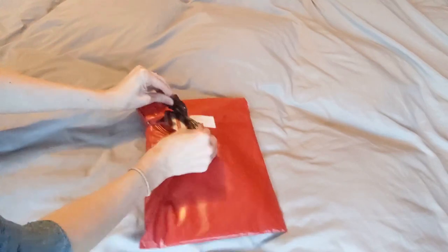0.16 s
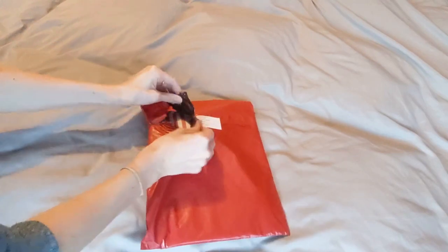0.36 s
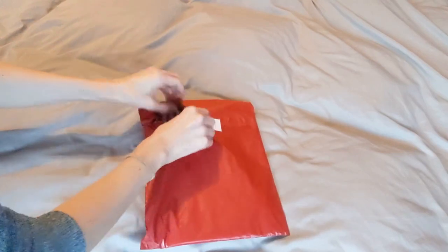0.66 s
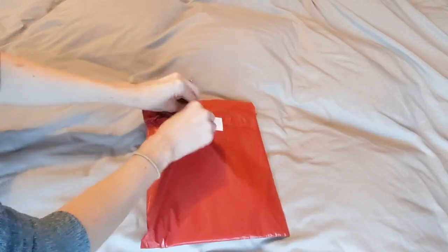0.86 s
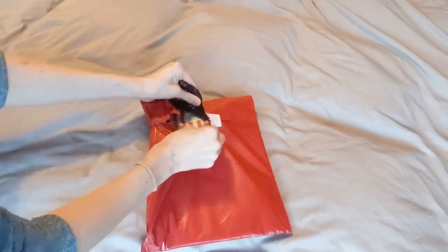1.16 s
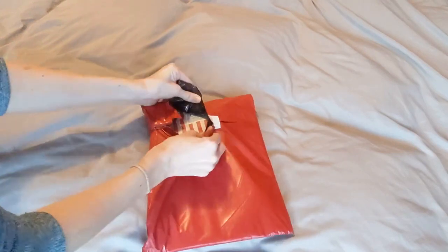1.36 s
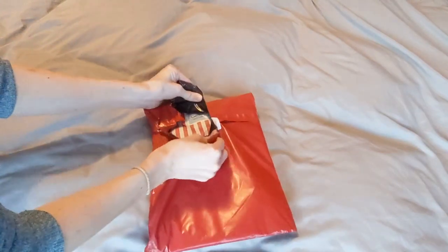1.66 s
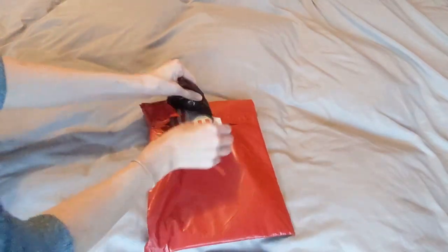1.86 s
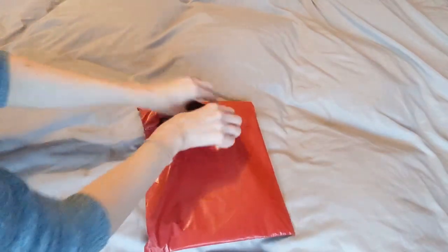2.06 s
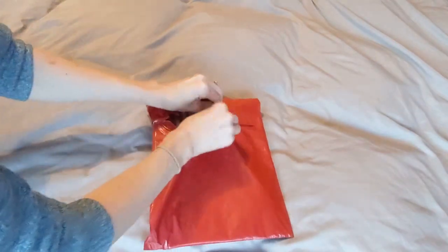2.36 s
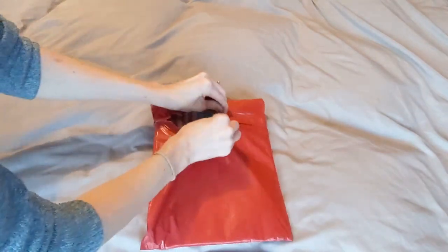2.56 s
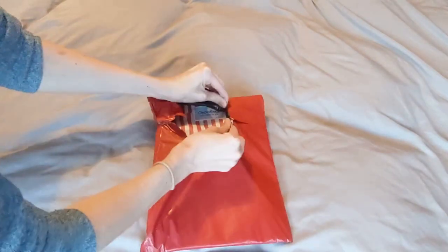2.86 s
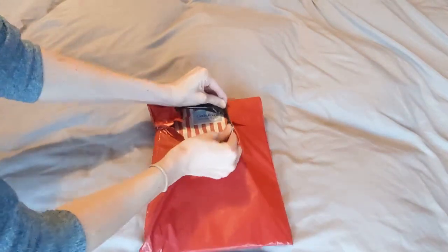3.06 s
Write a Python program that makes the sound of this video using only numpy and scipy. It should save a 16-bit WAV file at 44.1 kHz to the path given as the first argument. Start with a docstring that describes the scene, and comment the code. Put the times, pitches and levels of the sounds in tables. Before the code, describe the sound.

Close, crisp plastic crinkling in uneven bursts, with sharp snaps, over faint room hiss

```python
"""A small, soft bedroom: two hands tug and tear open a thin plastic mailer bag on a bed,
close to a stereo microphone. Each pull lets through a swarm of tiny random buckles, and single
folds snap as bursts ringing their patch of film. Sliding fingers are resonant noise with a gliding
pitch, bumps are short low tones. Changing echoes of noise answer briefly over a faint steady hiss."""
import sys
import numpy as np
from scipy import signal
from scipy.fft import rfft, irfft
from scipy.io import wavfile

SR = 44100
rng = np.random.default_rng(int(sys.argv[2]) if len(sys.argv) > 2 else 0)


def transcribe(u):
    """Save the signal u as a 16-bit wav file named by the first command-line argument.

    u: samples, shape (n,) or (channels, n), limited to [-1, 1]; the rate is SR.
    q: integer samples, one column per channel.
    """
    v = np.clip(np.atleast_2d(u).T, -1, 1)
    q = np.round(v * 32767).astype(np.int16)
    wavfile.write(sys.argv[1], SR, q)


N = 141120
TAPS = 2048  # filter length
HZ = np.fft.rfftfreq(TAPS, 1 / SR) + 1  # filter frequencies, kept above zero

# pulls on the film, levels ahead of CRINKLE_DB
# [start t/s, length t/s, start level/dB, end level/dB, body/dB, treble/dB, ring of the taut patch f/Hz]
PULLS = [(0.0, 0.066, -43, -49.5, 17.5, 2.5, 3240), (0.098, 0.077, -54, -54, 12, -3, 3950),
         (.162, 0.067, -44, -38, 1, 2, 3420), (0.225, 0.028, -27.5, -24, 5.5, 4, 3000),
         (0.261, 0.03, -24, -29.5, 1.5, 2.5, 1420), (0.296, 0.11, -36, -48.5, 0, 0, 2800),
         (0.468, 0.029, -49, -41.5, -3, -2, 3130), (.512, 0.027, -36.5, -47.5, 8.5, -1, 4430),
         (0.628, 0.032, -40.5, -50, 11.5, -1, 1950), (0.732, 0.087, -44.5, -44, 9, 4.5, 5400),
         (0.89, 0.096, -44, -61.5, 12.5, -0.5, 2020), (0.945, 0.21, -35, -40, 6, 3.5, 2740),
         (1.136, 0.061, -26, -27, 3.5, 4, 1950), (1.202, 0.1, -48, -41, 7, 6, 2900),
         (1.315, 0.053, -33, -44.5, -20, -0.5, 2850), (1.371, 0.039, -28.5, -43.5, -3, 5.5, 2640),
         (1.488, 0.17, -38.5, -35.5, 3, 7, 3180), (1.672, 0.028, -25, -40, -4.5, 0.5, 1640),
         (1.706, 0.12, -46.5, -51, 3.5, -5, 3870), (1.866, 0.093, -49, -52.5, 16.5, -11, 2550),
         (1.968, 0.044, -39, -35, 0, -3, 3100), (2.043, 0.062, -45, -48.5, 7.5, -8, 3680),
         (2.147, 0.14, -45, -50.5, 13, -8.5, 4530), (2.327, 0.14, -48.5, -38.5, 8, -6, 3880),
         (2.463, 0.049, -29, -36.5, -9.5, -1.5, 3660), (2.507, 0.067, -41, -41.5, 3.5, -10, 2670),
         (2.649, 0.064, -55.5, -43, 15, -18, 3050), (2.73, 0.028, -44.5, -40.5, -5, 8, 2380),
         (2.801, 0.026, -43.5, -35, -2, 6, 2770), (2.831, 0.086, -32.5, -35, -7.5, -5.5, 1750),
         (3.165, 0.026, -56, -38.5, -12, 4.5, 3160)]
# colour of the crinkling film [f/Hz, relative level/dB]
FILM_COLOUR = [(60, -49), (150, -31), (260, -29.5), (390, -15), (490, -18), (680, -7), (950, -8),
               (1170, -8), (1650, -3), (3300, -2), (5300, -3), (7400, -10), (10500, -5.5), (16000, -15.5)]

HISS_DB, HISS_LIKENESS = -64, 0.71  # likeness of left and right
SAME_BELOW_HZ, ROOM_SAME_BELOW_HZ = 2980, 970  # the channels grow alike below these
BOUNCE_S, BOUNCE_DB = 0.004, -1.5  # scatter off hands and bag
PATH_S = 0.06  # spacing between changes of echo path
THUMP_S = 0.002  # time to a thump's envelope peak
SLIDE_WIDTH_HZ = 370  # bandwidth of each of the two resonant poles
BODY_HZ, TREBLE_HZ, RING_OCTAVES = 1570, 6400, 0.25  # shelf corners, half-width of a ring
GENTLE_DB, DOUBLING_DB = -40, 11  # creases come twice as fast for every DOUBLING_DB of a harder pull
CREASES_PER_S, CREASE_SPREAD_DB, CREASE_S = 900, 3.5, 0.00026  # the rate in a pull of GENTLE_DB
CREASE_LOW_HZ, CREASE_HIGH_HZ, CREASE_RING_DB, CREASE_PAN_DB = 1395, 8740, 12.5, 2
PATCH_S, PATCH_DB = 0.014, 3.5  # each patch of film is busy in short spells
ATTACK_S, RELEASE_S, PULL_RING_DB = 0.001, 0.0088, 6.5  # of a pull
CRINKLE_DB, SNAP_DB = -3.5, -2  # trims of the two layers
IDLE_DB = -63  # faint ticking of the film beneath the pulls
REST_S, REST_DB = (2.99, 3.105), -15  # the hands hold almost still: the ticking drops
SNAP_S, SNAP_LEVEL_S, SNAP_RING_DB = 0.0005, 0.0011, 13.5  # a snap's level is its rms over SNAP_LEVEL_S
LEAD_S, LEAD_DB, LEAD_SPAN_S = 0.0028, -11, 0.008  # small slips crowd around the moment a fold gives
EDGE_HZ = 16100  # top of the recorder's band


def amp(db):
    """Decibels to gain."""
    return 10 ** (np.asarray(db) / 20)


def unit(x):
    """Scales to a mean energy per channel of one."""
    return x / np.sqrt(np.mean(np.sum(x ** 2, -1)) + 1e-20)


def read(points, hz):
    """Reads a table on a log-frequency axis."""
    f, value = np.transpose(points)
    return np.interp(np.log(hz + 1), np.log(f), value)


def add(mix, s, sound):
    """Mixes a sound into a stereo mix at a time in seconds."""
    part = mix[:, max(0, round(s * SR)):][:, :sound.shape[1]]
    part += sound[:, :part.shape[1]]


def colour(x, db):
    """Filters causally, at minimum phase, with the given gain at the frequencies HZ."""
    log_gain = np.log(amp(np.r_[db, db[-2:0:-1]]))
    response = np.exp(np.conj(signal.hilbert(log_gain)))
    taps = np.fft.ifft(response).real
    return signal.fftconvolve(x, taps[None], axes=1)


def blend(a, b, same):
    """Stereo pair of spectra sharing the fraction same, with the power of each side kept."""
    return np.array([a, same * a + np.sqrt(1 - same ** 2) * b])


def pair(x, corner_hz):
    """Makes two unrelated channels alike below a corner."""
    a, b = rfft(x)
    size = x.shape[1]
    same = 1 / (1 + (np.fft.rfftfreq(size, 1 / SR) / corner_hz) ** 2)
    return irfft(blend(a, b, same), size)


def pan(db):
    """Channel gains for a left-right difference."""
    return amp([[db / 2], [-db / 2]])


def film(body_db, treble_db):
    """The film's colour with shelves for its body and treble."""
    body = body_db / (1 + (HZ / BODY_HZ) ** 4)
    treble = treble_db / (1 + (TREBLE_HZ / HZ) ** 4)
    return read(FILM_COLOUR, HZ) + body + treble


def ring(hz):
    """A bump of height one around the resonance of one patch of film."""
    return 1 / (1 + (np.log2(HZ / hz) / RING_OCTAVES) ** 2)


def crack(decay_s):
    """One buckle: a noise burst that rises at once and dies within a few milliseconds."""
    u = np.arange(TAPS // 8) / SR / decay_s
    noise = pair(rng.choice([-1., 1.], (2, len(u))), SAME_BELOW_HZ)
    return noise * u * np.exp(1 - u)


def hiss():
    """Steady background of the quiet room: coloured noise, partly shared between the channels."""
    # hiss density [f/Hz, relative level/dB per Hz]
    hiss_colour = [(20, -25), (48, -7.5), (62, -23), (150, -16.5), (400, -0.5), (1100, 4.5), (1800, -5.5),
                   (4600, -12), (16000, -56)]
    gain = amp(read(hiss_colour, np.fft.rfftfreq(N, 1 / SR)))
    a, b = rfft(rng.standard_normal((2, N))) * gain
    noise = irfft(blend(a, b, HISS_LIKENESS), N)
    return amp(HISS_DB) * np.sqrt(N) * unit(noise)


def echoes():
    """Quick scatter from close by, and a short room tail dying faster in the treble."""
    # room decay [f/Hz, t60/s]
    decay_times = [(200, 0.29), (4000, 0.12), (15000, 0.02)]
    # room tail against the direct sound [f/Hz, level/dB]
    tail_levels = [(200, -6), (2500, -8.5), (8000, -4.5), (15000, 1.5)]
    t = np.arange(SR // 3) / SR
    near, far = (pair(rng.standard_normal((2, len(t))), ROOM_SAME_BELOW_HZ) for _ in range(2))
    scatter = unit(near * (t > 0.001) * np.exp(-t / BOUNCE_S))
    hz, times, z = signal.stft(far, SR, nperseg=256)
    decay = amp(-60 * times / read(decay_times, hz)[:, None])
    decay = decay / np.linalg.norm(decay, axis=1, keepdims=True)  # equal energy in every band
    tail = signal.istft(z * decay, SR)[1][:, :len(t)]
    tail = tail * np.minimum(t / 0.013, 1)  # the tail builds up over 13 ms
    return colour(unit(tail), read(tail_levels, HZ))[:, :len(t)] + amp(BOUNCE_DB) * scatter


def bedroom(x, count=6):
    """Direct sound plus echoes whose paths crossfade, one every PATH_S, as the film turns."""
    out = x
    for k in range(count):
        turn = (np.arange(N) / SR / PATH_S - k) % count
        fade = np.sin(np.pi / 2 * np.minimum(turn, 2))  # in and out again over two steps
        out = out + signal.oaconvolve(x * fade, echoes(), axes=1)[:, :N]
    return out


def thumps():
    """Fingers bump the bag, which answers with a soft, low tone that dies at once."""
    # bumps [t/s, envelope peak level/dB, pitch f/Hz]
    bumps = [(2.729, -68, 170), (2.839, -79, 62), (2.845, -59, 353), (2.889, -53.5, 385)]
    out, t = np.zeros((2, N)), np.arange(TAPS) / SR
    envelope = t / THUMP_S * np.exp(1 - t / THUMP_S)
    for s, db, hz in bumps:
        tone = envelope * np.sin(2 * np.pi * hz * t)
        add(out, s, amp(db) * tone[None])
    return out


def slides():
    """Fingertip friction excites a patch whose resonance moves with the stretch; it swells and fades."""
    # strokes on the film [start t/s, length t/s, level/dB, start f/Hz, end f/Hz]
    strokes = [(0.746, 0.091, -49, 2050, 2280), (0.883, 0.052, -56, 2170, 1960),
               (1.902, 0.077, -53.5, 2180, 3080)]
    out = np.zeros((2, N))
    r = np.exp(-np.pi * SLIDE_WIDTH_HZ / SR)  # pole radius
    for start, length, db, start_hz, end_hz in strokes:
        u = np.arange(0, 1, 1 / (length * SR))
        hz = start_hz + (end_hz - start_hz) * u ** 2
        turn = np.exp(2j * np.pi * np.cumsum(hz) / SR)
        friction = pair(rng.standard_normal((2, SR)), SAME_BELOW_HZ)[:, :len(u)]
        # shift the moving pitch to zero, filter there, and shift back
        resonance = (turn * signal.lfilter([1], np.poly([r, r]), friction / turn)).real
        rub = resonance * np.sqrt(u * np.sin(np.pi * u))
        add(out, start, amp(db) * np.sqrt(len(u)) * unit(rub))
    return out


def creases(count=28):
    """Tiny buckles, sparse in a gentle pull and crowded in a hard one, from patches busy in spells."""
    out, t, rate = np.zeros((2, N)), np.arange(N) / SR, np.full(N, CREASES_PER_S * 1.)
    for start, length, start_db, end_db, *_ in PULLS:
        db = np.interp(t, [start, start + length], [start_db, end_db])
        pulled_rate = CREASES_PER_S * 2 ** ((db - GENTLE_DB) / DOUBLING_DB)
        rate = np.where((t >= start) & (t < start + length), pulled_rate, rate)
    for hz in np.geomspace(CREASE_LOW_HZ, CREASE_HIGH_HZ, count):
        grain = unit(colour(crack(CREASE_S), CREASE_RING_DB * ring(hz)))
        grain = grain * pan(CREASE_PAN_DB * rng.standard_normal())
        busy = np.interp(t / PATCH_S, np.arange(TAPS), rng.uniform(-2.1, 1.95, TAPS))
        size_db = CREASE_SPREAD_DB * np.minimum(rng.exponential(1, N), 3) + PATCH_DB * busy
        size = amp(size_db) * rng.choice([-1, 1], N)
        strikes = rng.random(N) < rate / count / SR
        train = size * strikes * np.sqrt(CREASES_PER_S / rate)  # crowding leaves the power even
        out += signal.oaconvolve(train[None], grain, axes=1)[:, :N]
    return out


def crinkle():
    """Each pull lets the swarm through, coloured by the patch held taut, as the strain grows or eases."""
    swarm, out = creases(), np.zeros((2, N))
    t = np.arange(SR // 4) / SR
    for start, length, start_db, end_db, body_db, treble_db, hz in PULLS:
        envelope = np.minimum(t / ATTACK_S, 1) * np.exp(-np.maximum(t - length, 0) / RELEASE_S)
        envelope = envelope * amp(np.interp(t, [0, length], [start_db, end_db]))
        part = np.roll(swarm, -round(start * SR), axis=1)[:, :len(t)]
        part = colour(part * envelope, film(body_db, treble_db) + PULL_RING_DB * ring(hz))
        add(out, start, unit(part) * np.linalg.norm(envelope))
    now = np.arange(N) / SR
    resting = (now > REST_S[0]) & (now < REST_S[1])
    ticking = np.sqrt(N) * unit(colour(swarm, read(FILM_COLOUR, HZ))[:, :N])
    return amp(CRINKLE_DB) * out + amp(IDLE_DB + REST_DB * resting) * ticking


def snaps():
    """Larger folds flip over: a flurry of slips around one crack, ringing their own patch of film."""
    # folds giving way, levels ahead of SNAP_DB [t/s, level/dB, ring f/Hz, treble/dB]
    folds = [(0.0217, -38, 2530, 8), (0.0897, -37.5, 4500, 8), (0.1169, -34, 1440, -6),
             (0.1636, -28.5, 5200, 10), (0.1813, -32, 2700, 5), (0.211, -27, 2370, -10),
             (0.2575, -16.5, 1480, -3), (0.3778, -31.5, 3370, -1), (0.4756, -32.5, 2050, -0.5),
             (0.513, -29, 3800, 9), (0.523, -31, 2660, 10), (0.5733, -33, 9700, -6), (0.584, -25, 4160, 10),
             (0.6183, -27, 2940, -1), (0.6365, -26, 2090, -1), (0.7272, -39, 11000, 0),
             (0.748, -34.5, 5460, 10), (0.7912, -35, 2130, -6), (0.8, -35, 2280, -15),
             (0.937, -36.5, 2100, 19), (0.954, -25.5, 2000, 1), (1.0052, -26, 2050, 6),
             (1.077, -30, 2690, 13), (1.093, -34, 2100, -10), (1.1031, -26.5, 1980, 1),
             (1.186, -21.5, 1810, 14), (1.1978, -25.5, 4500, 18), (1.3232, -20.5, 2600, 9),
             (1.3542, -26.5, 2350, 1), (1.38, -25, 1920, -9), (1.4932, -41, 3200, 6), (1.506, -26, 3200, 1),
             (1.5496, -26.5, 3350, 1), (1.5863, -22.5, 4670, 8), (1.6392, -25, 2780, 6),
             (1.6855, -23, 2600, 7), (1.7384, -31, 7600, 14), (1.7606, -30, 2760, -2),
             (1.7771, -22.5, 3600, 3), (1.8152, -33, 4000, -9), (1.832, -35.5, 3480, -26),
             (1.9659, -21.5, 2900, -6.5), (1.994, -25, 2130, -1), (2.0075, -27.5, 2180, 21),
             (2.0484, -30, 2530, 8), (2.077, -37.5, 4220, -10), (2.155, -30.5, 3700, -4),
             (2.163, -30.5, 3370, -22), (2.1818, -26.5, 5030, 0), (2.2114, -26, 4530, 5),
             (2.2595, -28.5, 3900, 7.5), (2.3349, -30.5, 4100, 0.5), (2.385, -24.5, 4000, 6.5),
             (2.423, -29.5, 1540, 3), (2.434, -25.5, 4000, -12), (2.439, -20, 3470, 3),
             (2.4621, -25, 3400, 23), (2.4827, -21.5, 3450, 3), (2.5704, -31, 2440, 1),
             (2.6742, -24.5, 3000, 2.5), (2.678, -27, 2950, 0), (2.699, -29, 3660, -3),
             (2.7505, -28.5, 2800, -4), (2.8355, -24, 1670, -4), (2.8436, -21, 2200, -5),
             (2.8596, -21.5, 4270, 9.5), (2.9113, -26.5, 1750, -4), (2.9496, -34.5, 1590, 22)]
    out, t = np.zeros((2, N)), np.arange(TAPS // 2) / SR - LEAD_SPAN_S  # the fold gives at t = 0
    for s, db, hz, treble_db in folds:
        slips = rng.standard_normal((2, len(t))) * rng.exponential(0.47, len(t))
        push = pair(slips, SAME_BELOW_HZ) * amp(LEAD_DB) * np.exp(-abs(t) / LEAD_S)
        add(push, LEAD_SPAN_S, crack(SNAP_S))
        snap = colour(push, film(0, treble_db) + SNAP_RING_DB * ring(hz))
        add(out, s - LEAD_SPAN_S, unit(snap) * np.sqrt(SNAP_LEVEL_S * SR) * amp(db))
    return amp(SNAP_DB) * out


def scene():
    """The bag in the room, leaning left through the middle of its range, over the hiss."""
    # balance of the bag [f/Hz, left over right level/dB]
    balance = [(150, -1.5), (900, 5), (2800, 2), (5600, 1.5), (11000, -1), (14000, -5.5)]
    bag = bedroom(crinkle() + snaps() + slides() + thumps())
    lean = read(balance, HZ) / 2
    left, right = colour(bag[:1], lean), colour(bag[1:], -lean)
    return np.vstack([left, right])[:, :N] + hiss()


def record(dry):
    """The recorder's band limit: a linear-phase low-pass at EDGE_HZ."""
    taps = signal.firwin(401, EDGE_HZ, window=("kaiser", 9), fs=SR)
    return signal.oaconvolve(dry, taps[None], "same")


dry = scene()
out = record(dry)
transcribe(out)
```